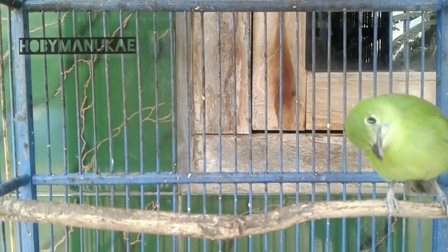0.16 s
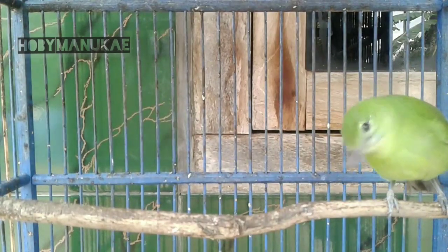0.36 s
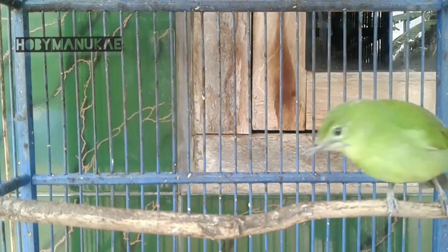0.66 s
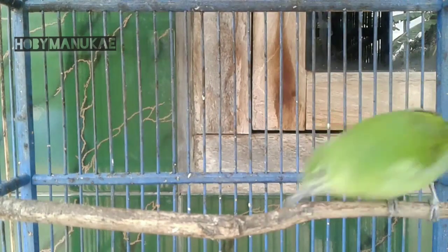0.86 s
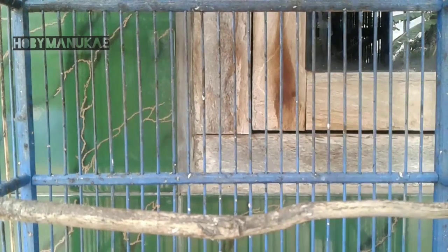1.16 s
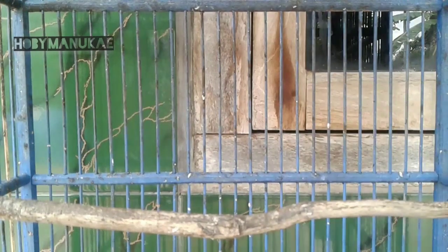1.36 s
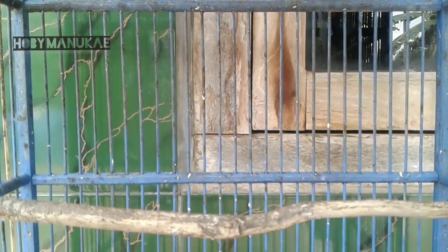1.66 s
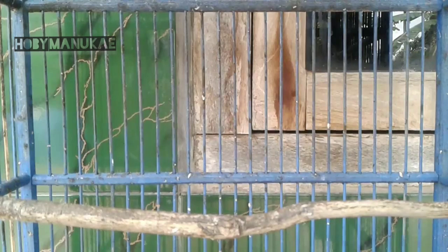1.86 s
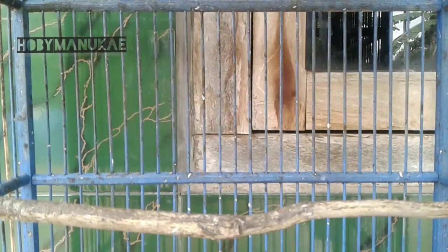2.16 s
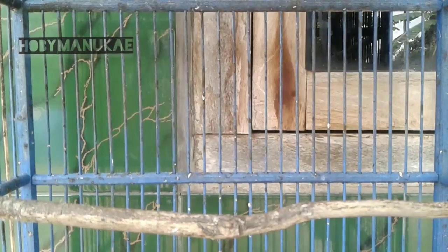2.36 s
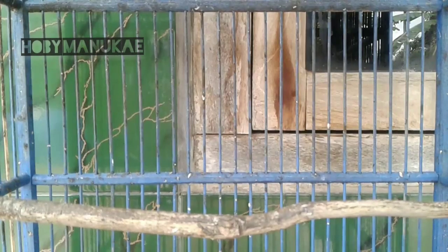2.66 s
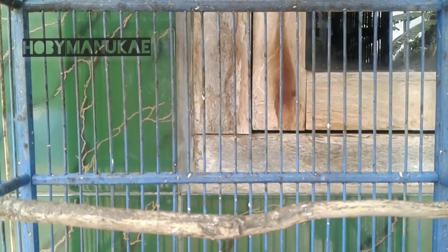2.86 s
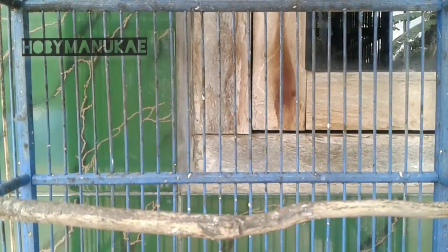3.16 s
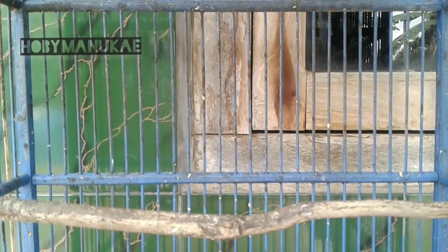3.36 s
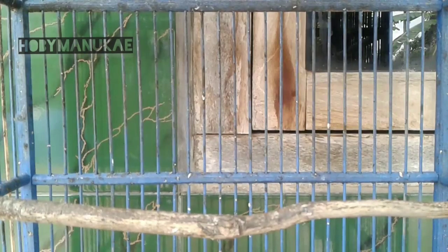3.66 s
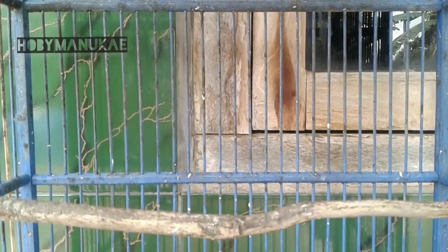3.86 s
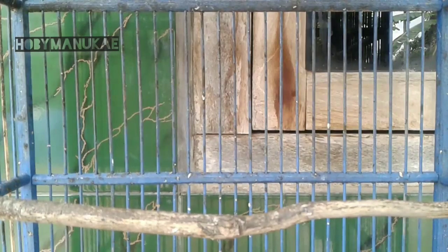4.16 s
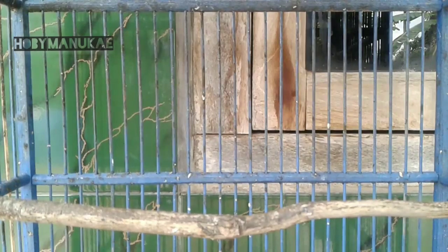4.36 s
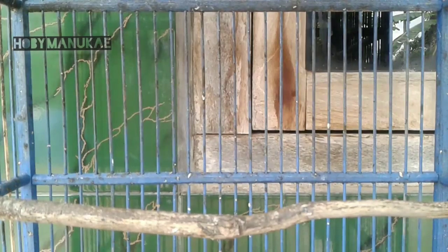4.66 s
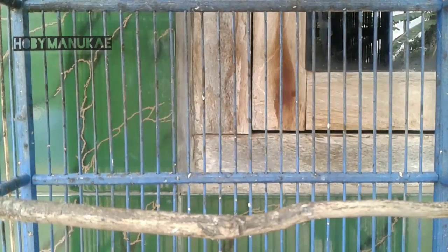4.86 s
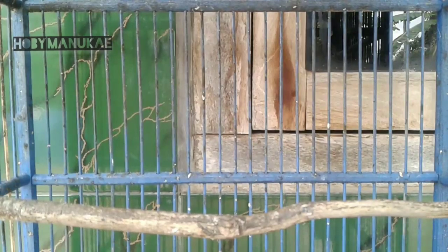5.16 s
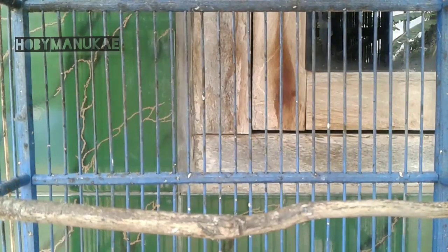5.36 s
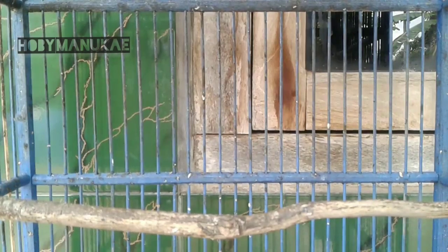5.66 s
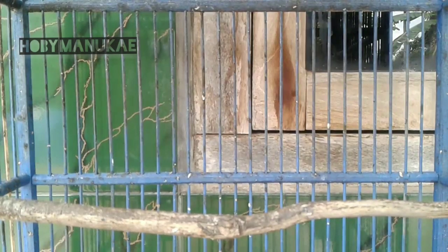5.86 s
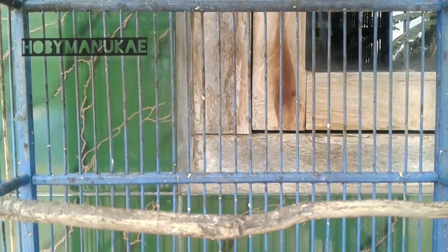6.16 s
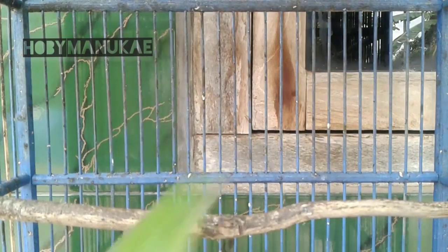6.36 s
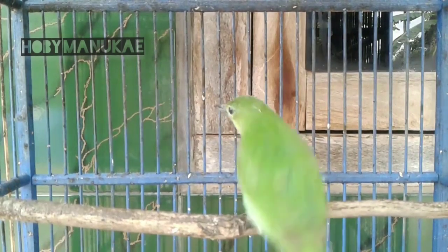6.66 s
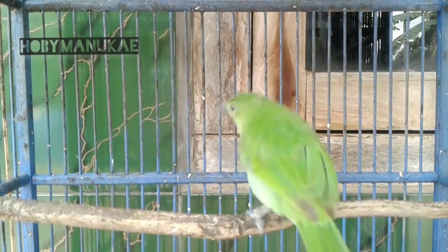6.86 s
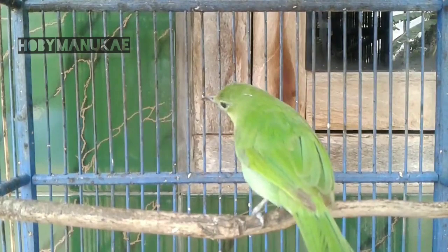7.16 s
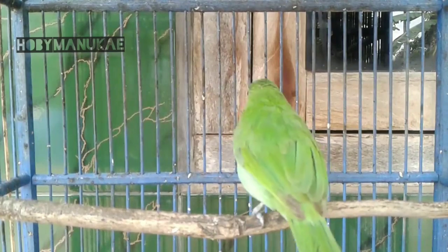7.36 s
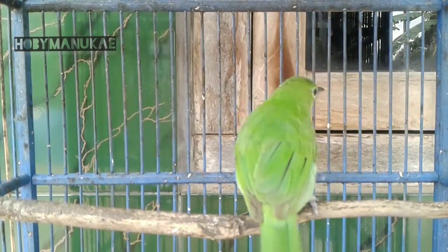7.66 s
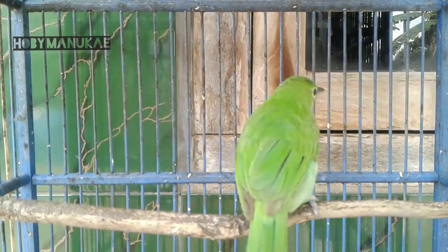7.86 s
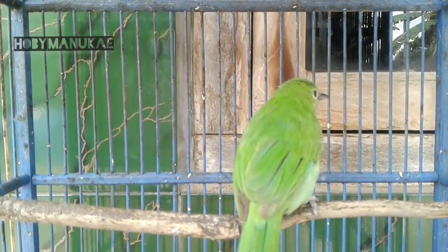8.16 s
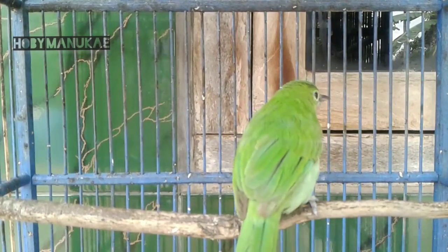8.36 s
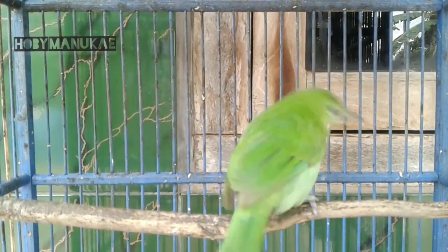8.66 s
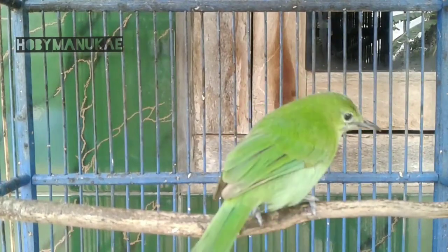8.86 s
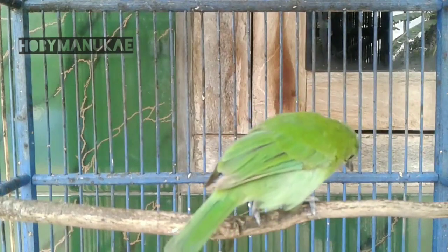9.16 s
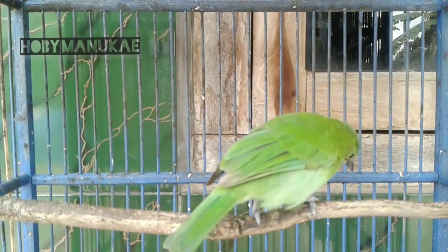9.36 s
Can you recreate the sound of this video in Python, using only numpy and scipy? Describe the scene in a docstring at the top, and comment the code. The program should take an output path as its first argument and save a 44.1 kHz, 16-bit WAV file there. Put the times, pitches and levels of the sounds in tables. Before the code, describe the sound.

Outdoor air and a low rumble that stops early lie under loud, close cage-bird song. Buzzes come first, then a thin rising whistle, clipped chip pairs, ringing slurs and more buzzes, with a faint rooster behind. After a pause with mellow churrs and a farther bird's faint whistles, a rapid rasping run ends in sharp chips. A far engine swells to the end; near walls add quick reflections.

```python
"""Buzzy down-slurs over low rumble and outdoor air: a leafbird sings in a cage on a porch, close to the microphone.
A far rooster crows; clipped chip pairs, ringing slurs, soft churrs and two-voiced rasps follow, and an engine swells.
Thin rising whistles come ahead of the chips, churrs and rasps; a farther bird whistles too, and a faint hoot falls.
Song notes are swept oscillators with overtones and air noise, thrown back by near walls; the rooster and hoot are
swept tones too, the engine a set of wavering lines, the air and rumble coloured noise."""
import sys
import numpy as np
from scipy import signal
from scipy.fft import rfft, irfft
from scipy.io import wavfile
from scipy.ndimage import uniform_filter1d, map_coordinates

SR = 44100
rng = np.random.default_rng(int(sys.argv[2]) if len(sys.argv) > 2 else 0)


def dump_mix(stems):
    """Bounce the given channels to the path in sys.argv[1] as a 16-bit WAV at rate SR."""
    frames = np.atleast_2d(stems).T  # one column per channel
    limited = np.clip(frames, -1, 1)  # hard clip at full scale
    pcm = np.round(limited * 32767).astype(np.int16)
    wavfile.write(sys.argv[1], SR, pcm)


N = 418950
TIME = np.arange(N) / SR  # s


def from_db(db):
    """Decibels to gain."""
    return 10 ** (np.asarray(db) / 20)


def rms_one(x):
    """Scale to unit power."""
    return x / np.sqrt(np.mean(x ** 2) + 1e-20)


def in_time(rows):
    """Each column of a curve at every sample."""
    s, *columns = np.transpose(rows)
    return [np.interp(TIME, s, c) for c in columns]


def coloured(spectrum, size=N):
    """Noise of unit power, shaped by a spectrum drawn straight in dB over log frequency."""
    hz, db = np.transpose(spectrum)
    grid = np.maximum(np.fft.rfftfreq(size, 1 / SR), 1)
    gain = from_db(np.interp(np.log(grid), np.log(hz), db))
    return rms_one(irfft(rfft(rng.standard_normal(size)) * gain, size))


def wander(rate, t):
    """Smooth chance of spread about 1, through `rate` random knots a second."""
    knots = rng.standard_normal(1024)
    return map_coordinates(knots, [(t - t[0]) * rate], order=3, mode="wrap")


def turning(hz):
    """Phase of an oscillator that follows a frequency."""
    return 2 * np.pi * np.cumsum(hz) / SR


def note_span(start, length):
    """Samples of a note, and the share of it that has passed at each."""
    at = np.arange(int(start * SR), min(int((start + length) * SR), N))
    return at, np.clip((TIME[at] - start) / length, 0, 1)


def arch(u, first, top, last, crest, bend):
    """Pitch bends from first to top at share `crest` of the note, then on to last."""
    crest = np.clip(crest, .05, .95)
    approach = (first - top) * np.abs(1 - u / crest) ** bend
    departure = (last - top) * ((u - crest) / (1 - crest)) ** 2
    return top + np.where(u < crest, approach, departure)


def swell(u, rise, fall):
    """Air pressure builds over the first share of a note and ebbs over the last."""
    building = np.sin(np.pi / 2 * np.minimum(u / rise, 1)) ** 2
    return building * np.sin(np.pi / 2 * np.minimum((1 - u) / fall, 1))


def syrinx(phase, tone_db, bright=1):
    """A vibrating membrane: a sine, with overtones that `bright` scales."""
    overtones = sum(from_db(db) * np.sin(k * phase) for k, db in enumerate(tone_db[1:], 2))
    return np.sqrt(2) * (from_db(tone_db[0]) * np.sin(phase) + bright * overtones)


def dulled(x, cut_hz, order=2):
    """Low-pass: treble above the cut is lost."""
    sections = signal.butter(order, min(cut_hz, .45 * SR), fs=SR, output="sos")
    return signal.sosfilt(sections, x + 1e-18)


def porch(x, walls_db, tail_db, t60=0.42):
    """Echoes from near walls and floor, most of them duller the later they come, then a diffuse tail."""
    # near walls and floor: delay/s, level/dB, treble cut f/Hz
    walls = [(.0017, -16, 11850), (.0031, -9.5, 11920), (.0052, -13.5, 10550), (.0074, -12.5, 9030),
             (.0128, -11, 8140), (.0195, -14.5, 7000), (0.03, -17, 6000), (.068, -30.5, 4986)]
    t = TIME[:SR]
    tail_noise = coloured([(500, 7), (2500, -0.5), (6000, 4.0), (8000, -3), (15000, 0.0)], size=SR)
    tail = tail_noise * from_db(-60 * t / t60) * np.minimum(t / .012, 1)
    echoes = sum(from_db(db) * np.interp(TIME - delay, TIME, dulled(x, cut_hz), left=0)
                 for delay, db, cut_hz in walls)
    diffuse = signal.fftconvolve(x, rms_one(tail) / np.sqrt(SR))[:N]
    return x + from_db(walls_db) * echoes + from_db(tail_db) * diffuse


def outdoor_air():
    """Steady broadband air around the porch: coloured noise on a slow level curve."""
    # colour of the air: f/Hz, relative level per Hz/dB
    air_colour = [(25, -8), (45, -9.5), (100, -12), (135, -12.5), (200, -3.5), (330, -4.5), (600, -7.5),
                  (1500, -9.5), (3300, -11.5), (5000, -16), (9000, -21.5), (15500, -21.5)]
    # its level: t/s, level/dB
    air_level = [(0, -49), (1.1, -54.5), (1.2, -55), (3.8, -56.5), (6, -55.5), (8.4, -54.5), (9.5, -54.5)]
    return from_db(in_time(air_level)[0]) * coloured(air_colour)


def passing_rumble():
    """Flickering coloured noise, mostly low, that stops short."""
    # colour of the rumble: f/Hz, relative level per Hz/dB
    rumble_colour = [(18, -41), (30, -12.5), (161, -3.5), (365, -15), (762, -13), (1010, -17), (1170, -8),
                     (1730, -18.5), (4000, -19.5), (5200, -52.5), (8800, -120)]
    # its level ahead of the flicker: t/s, level/dB
    rumble_level = [(0, -49.5), (.42, -52.5), (.62, -50), (1.14, -49.5), (1.18, -95), (9.5, -100)]
    return from_db(in_time(rumble_level)[0] + 1.3 * wander(30, TIME)) * coloured(rumble_colour)


def engine():
    """A distant engine draws nearer: steady lines that waver in pitch and level and swell unequally."""
    # lines of the hum: centre f/Hz, level at 0 dB of swell/dB, share of the swell each follows
    hum_lines = [(90.6, -68.5, 1.2), (186, -63, 1.6), (322, -64, 1.3), (378.5, -68, 3.3), (470, -66.5, 1),
                 (505, -75, 1.3), (607, -65.5, 1.2)]
    # swell of the hum: t/s, level/dB
    hum_swell = [(0, -24), (3.5, -22.5), (4.5, -15), (7, -5.5), (8.4, -4), (9.1, -0.5), (9.5, 2)]
    near_db, hum = in_time(hum_swell)[0], 0
    for hz, db, share in hum_lines:
        sway, flicker = (np.interp(TIME, TIME[::50], wander(7, TIME[::50])) for _ in range(2))
        line = syrinx(turning(hz * (1 + 0.0088 * sway)), [db])
        hum = hum + from_db(share * near_db + 3.0 * flicker) * line
    return hum


def buzzes(rustle, flutter_hz=390, throb=0.53, jitter_hz=70, air_db=-24, pulsing_db=4):
    """A fast, slowing flutter shakes pitch and level of each arched note; the middle is the harshest."""
    # buzzy down-slurs: t/s, length/s, reference f/Hz, flutters at first/Hz, overtones at mid-note/dB, level/dB
    buzz_notes = [(0.057, 0.12, 3120, 107, -3.5, -8.5), (.305, .132, 2920, 91, 0, -9),
                  (2.249, 0.11, 3156, 78.4, 3.5, -6), (2.451, 0.12, 2790, 104.5, -1.5, -10.5),
                  (2.663, .12, 2912, 81.5, 1.5, -8.5), (2.879, .128, 2888, 115, 0, -10),
                  (3.084, 0.12, 2957, 84, 1, -9), (3.377, 0.099, 3070, 93, 0, -6.5),
                  (3.6, .142, 3130, 66.5, -0.5, -8.5)]
    # harmonics 1, 2, ..: level/dB
    buzz_tone = [-2, -35, -32.5, -48.5]
    first, top, last = .72, .99, .54  # shares of the reference pitch
    slowing = 0.2214  # share of the flutter rate lost by the end of a note
    out = np.zeros(N)
    for start, length, reference_hz, rate, bright_db, db in buzz_notes:
        at, u = note_span(start, length)
        flutter = -np.cos(turning(rate * (1 - slowing * u))) + .35 * wander(220, TIME[at])
        glide = reference_hz * arch(u, first, top, last, crest=.37, bend=2.6)
        pitch = glide + flutter_hz * flutter * (1.2 - 0.67 * u)
        pressure = swell(u, rise=0.25, fall=0.24) * from_db(-7 * u ** 4 + 3.3 * wander(154.5, TIME[at]))
        harsh = from_db(bright_db + 7.5 * (np.sin(np.pi * u) - 1))
        tone = syrinx(turning(pitch + jitter_hz * wander(1500, TIME[at])), buzz_tone, harsh)
        air = harsh * from_db(air_db + pulsing_db * wander(350, TIME[at])) * rustle[at]
        out[at] += from_db(db) * pressure * (1 + throb * flutter) * (tone + air)
    return out


def rooster():
    """One long far crow, faint and dry, strongest in its octave; its pitch and level waver at random."""
    # crow: t/s, fundamental f/Hz, level ahead of the random wavering/dB
    crow = [(0.55, 701.7, -61), (0.614, 746.0, -50.5), (0.786, 765.5, -71), (0.814, 730.5, -64),
            (1.116, 787.6, -58), (1.484, 785.2, -49.5), (1.688, 781.6, -51), (1.792, 732.6, -56),
            (2.22, 750.8, -57)]
    onset_db_per_s, fade_db_per_s = 600, 19  # slopes before the first point and after the last
    pitch, db = in_time(crow)
    before, after = np.maximum(crow[0][0] - TIME, 0), np.maximum(TIME - crow[-1][0], 0)
    tone = syrinx(turning(pitch * (1 + .006 * wander(81, TIME))), [-7, 0])  # fundamental, octave: dB
    return tone * from_db(db - onset_db_per_s * before - fade_db_per_s * after + 1.4 * wander(22, TIME))


def whistles(notes, length, last_hz, crescendo_db):
    """Near-pure rising sweeps that level off on a high pitch and grow louder."""
    # harmonics 1, 2: level/dB
    whistle_tone = [0, -27.5]
    out = np.zeros(N)
    for start, db in notes:
        at, u = note_span(start, length)
        glide = last_hz * arch(u, first=0.6, top=0.99, last=1, crest=0.88, bend=3.5)
        pitch = glide * (1 + 0.0043 * wander(143, TIME[at]))
        loudness = from_db(db - crescendo_db * (1 - u)) * swell(u, rise=0.12, fall=.2)
        out[at] += loudness * syrinx(turning(pitch), whistle_tone)
    return out


def chip_notes():
    """Each pair unfolds into a lead and an answer that overlap more under strain; ringing slurs join them."""
    # lead from one side of the syrinx, higher answer from the other:
    # t/s, delay of the answer/s, lead top f/Hz, answer top f/Hz, strain 0-1, lead level/dB, answer level/dB
    chip_pairs = [(1.602, 0.037, 3567, 4015, 0.71, -15, -6.5), (1.664, 0.031, 3900, 4280, 0.58, -5.5, -5),
                  (1.735, 0.022, 3870, 4410, 0.32, -5, -6), (1.792, .025, 3630, 4380, .14, -12.5, -10),
                  (8.212, 0.029, 3850, 4244, 0.57, -8, -9), (8.296, .024, 3923, 4270, .24, -2.5, -12),
                  (8.362, .024, 3830, 4130, 0.02, -4.5, -10), (8.425, 0.022, 3820, 3860, 0.06, -9.5, -14.5)]
    # slurs, sung like slow chips: t/s, length/s, first f/Hz, top f/Hz, last f/Hz, overtones/dB, level/dB
    ringing_slurs = [(1.963, 0.061, 3200, 3607, 3630, -7, 1), (2.095, 0.052, 4346, 4515, 4150, 2.5, -5.5),
                     (2.139, .047, 3026, 3954, 4400, 0, 1)]
    lead_first, lead_last = .74, 1.1  # shares of the top pitch, for an easy chip
    answer_first, answer_last, answer_s = .63, 1.02, .022
    # full strain starts a chip lower, holds it longer (s) and makes it brighter (dB)
    strain_dip, strain_hold_s, strain_bright_db = .24, .019, 22
    slur_strain = 0.27
    for start, delay, lead_hz, answer_hz, strain, lead_db, answer_db in chip_pairs:
        dip, hold = strain_dip * strain, strain_hold_s * strain
        bright_db = -11.5 + strain_bright_db * strain
        yield (start, delay + hold, (lead_first - dip) * lead_hz, lead_hz, lead_last * lead_hz,
               strain, bright_db, lead_db)
        yield (start + delay, answer_s + hold, (answer_first - dip) * answer_hz, answer_hz,
               answer_last * answer_hz, strain, bright_db, answer_db)
    for start, length, first, top, last, bright_db, db in ringing_slurs:
        yield start, length, first, top, last, slur_strain, bright_db, db


def chips(rustle, growl_hz=1400, air_db=-18, push_db=7):
    """Overlapping sweeps from the two sides of the syrinx start clean and growl under strain."""
    # harmonics 1, 2, ..: level/dB
    chip_tone = [-5.5, -30, -26.5, -33]
    out = np.zeros(N)
    for start, length, first, top, last, rough, bright_db, db in chip_notes():
        at, u = note_span(start, length)
        # a last push of air just before the note is cut off
        push = from_db(push_db * (np.exp(-((u - .68) / .2) ** 2) - .5))
        pressure = swell(u, rise=0.33, fall=.18) * push
        strain = rough * np.sin(np.pi * u) ** 2
        jitter = (25 + 140 * strain) * wander(1500, TIME[at])
        pitch = arch(u, first, top, last, crest=.78, bend=1.9) + jitter
        # the rougher the note, the faster its growl
        growl_rate = growl_hz * np.clip(1.3 * rough, .2, 1)
        growl = np.sin(turning(growl_rate * (1 + 0.12 * wander(300, TIME[at]))))
        phase = turning(pitch) + .42 * strain * growl
        tone = syrinx(phase, chip_tone, from_db(bright_db) * np.sqrt(pressure))
        out[at] += from_db(db) * pressure * (tone + strain * from_db(air_db) * rustle[at])
    return out


def hoot():
    """A faint, pure note from far off that sinks steadily, with a slight tremble in pitch."""
    first_hz, last_hz, level_db = 603, 533, -56.5
    out = np.zeros(N)
    at, u = note_span(start=2.82, length=.41)
    pitch = (first_hz + (last_hz - first_hz) * u) * (1 + .006 * wander(81, TIME[at]))
    out[at] = from_db(level_db) * swell(u, rise=0.18, fall=.25) * np.sin(turning(pitch))
    return out


def churrs(darkening_db=36):
    """Low, mellow notes hump up in pitch in the middle; their octave dies away from the start."""
    # soft arched churrs: t/s, reference f/Hz near the crest
    churr_notes = [(4.989, 2486), (5.108, 2500), (5.234, 2442), (5.366, 2332)]
    # harmonics 1, 2: level/dB
    churr_tone = [0, -9.5]
    first, last = .745, .68  # shares of the reference pitch
    out = np.zeros(N)
    for start, top in churr_notes:
        at, u = note_span(start, length=.068)
        base = top * (first + (last - first) * u)
        hump = np.sin(np.pi * np.clip((u - .14) / .86, 0, 1)) ** 2
        tone = syrinx(turning(base + (top - base) * hump), churr_tone, from_db(-darkening_db * u))
        out[at] += from_db(-28.5 + 2.0 * (hump - 1.5)) * swell(u, rise=0.37, fall=0.24) * tone
    return out


def rasps(rustle, interval=1.18, handover_db=9, air_db=-15, coupling=0.47):
    """Both sides sound a third apart, with sum tones and sidebands; the upper takes over within each note."""
    # two-voiced rasps: t/s, length/s, nominal top f/Hz of the lower voice, fade over the note/dB, level/dB
    rasp_notes = [(7.294, 0.094, 2814, -0.5, -16), (7.411, 0.082, 2874, 5.5, -14.5),
                  (7.516, 0.082, 2888, 16, -13), (7.625, 0.082, 3018, 20.5, -13),
                  (7.73, 0.086, 2874, 14.5, -14), (7.845, 0.082, 2716, 4, -13),
                  (7.962, .082, 2830, 10, -12), (8.086, .09, 2750, 11, -12.5)]
    # harmonics 1, 2, .. of the lower voice: level/dB
    rasp_tone = [-11, -2, -20.5, -20, -17.5]
    # the upper voice, then its sum tones with harmonics 1, 2, .. of the lower: level/dB
    sum_tones = [-4.5, -0.5, -20.5, -10, -18]
    first, last, crest = .63, .62, .68  # pitch as shares of the top, and the share of the length at the peak
    stray, strays_per_s = 0.01194, 109.8  # each voice leaves the arch on its own: share of pitch, knots per s
    loss_db_per_octave = 3  # a rasp is weaker below the top of its arch
    upper_loss_db_per_s = 8  # the upper voice weakens through the run
    out = np.zeros(N)
    for start, length, top, fade_db, db in rasp_notes:
        upper_db = -1 - upper_loss_db_per_s * (start - rasp_notes[0][0])
        at, u = note_span(start, length)
        pitch = top * arch(u, first, 1, last, crest, bend=2.8)
        low_hz, high_hz = (pitch * (1 + stray * wander(strays_per_s, TIME[at])) for _ in range(2))
        lower = turning(low_hz + 34 * wander(1800, TIME[at]))
        upper = turning(high_hz * interval + 35 * wander(2500, TIME[at]))
        # the beat between the sides pulls at both phases, which makes the sidebands
        beat = np.sin(upper - lower) + .5 * np.sin(2 * (upper - lower))
        pull = coupling * np.sqrt(np.abs(np.sin(np.pi * u))) * beat
        sums = np.sqrt(2) * sum(from_db(tone_db) * np.sin(upper + k * lower + pull)
                                for k, tone_db in enumerate(sum_tones))
        lead = from_db(handover_db * (u - .5))
        tone = syrinx(lower + pull / 2, rasp_tone) / lead + from_db(upper_db) * lead * sums
        level_db = db + fade_db * (.5 - u) + loss_db_per_octave * np.log2(pitch / top)
        pressure = from_db(level_db) * swell(u, rise=0.52, fall=0.32)
        out[at] += pressure * (tone + from_db(air_db) * rustle[at])
    return out


def scene():
    """Loud song close and direct; soft notes and a farther bird with stronger walls; the rest without the porch."""
    # colour of the air noise in the song: f/Hz, relative level/dB
    rustle_colour = [(600, -16), (1500, -14), (2500, 0.5), (5000, 2.5), (7300, -9.5), (9000, -10),
                     (12000, -4), (14000, -12), (16000, -6)]
    # thin whistles ahead of phrases: t/s, level at the end of the crescendo/dB
    near_whistles = [(1.18, -40.5), (3.893, -38.5), (7.117, -35)]
    # shorter, lower whistles in two pairs from a bird farther off: t/s, level at the end of the crescendo/dB
    far_whistles = [(4.205, -63), (4.610, -64), (6.245, -64), (6.650, -64.5)]
    rustle = coloured(rustle_colour)
    loud = porch(buzzes(rustle) + chips(rustle) + rasps(rustle), walls_db=0, tail_db=-18)
    closed_beak = dulled(churrs(), cut_hz=3900, order=10)
    thin = whistles(near_whistles, length=.13, last_hz=5072, crescendo_db=9.5)
    soft = porch(closed_beak + thin, walls_db=3.5, tail_db=-3.0)
    far = porch(whistles(far_whistles, length=.09, last_hz=3550, crescendo_db=1), walls_db=3, tail_db=3)
    background = outdoor_air() + passing_rumble() + engine()
    return (loud + soft + far + rooster() + hoot() + background)[None]


def gain_control(x, threshold_db=-19, slope=0.39, recovery_db_per_s=22):
    """Loud notes push the gain down; it creeps back between them."""
    level_db = 10 * np.log10(np.maximum(uniform_filter1d(x[0] ** 2, size=441), 1e-12))
    ramp = recovery_db_per_s * TIME
    wanted_cut_db = slope * np.maximum(level_db - threshold_db, 0)
    # a running maximum against the ramp lets each cut recover at a steady rate
    cut_db = np.maximum.accumulate(wanted_cut_db + ramp) - ramp
    return x * from_db(-uniform_filter1d(cut_db, size=221))


def record(dry):
    """The microphone's chain: gain control, rounded peaks and a steep treble cut."""
    cutoff_hz = 15600
    held = np.tanh(gain_control(dry * from_db(1.0)) / 1.92) * 1.71
    return signal.sosfilt(signal.ellip(14, .1, 90, cutoff_hz, fs=SR, output="sos"), held)


dry = scene()
out = record(dry)
dump_mix(out)
```